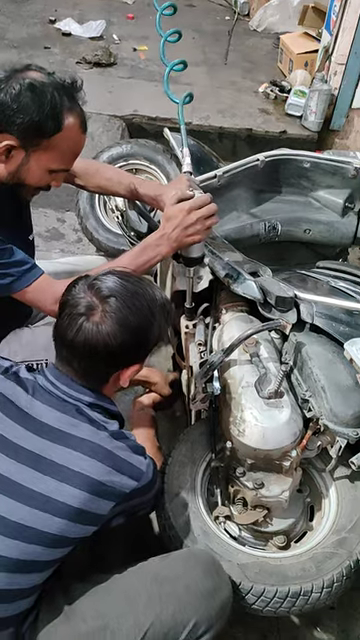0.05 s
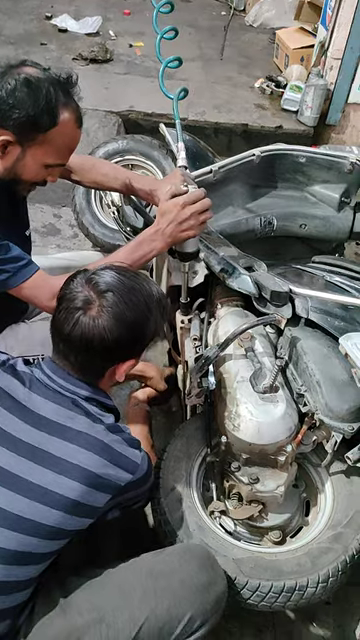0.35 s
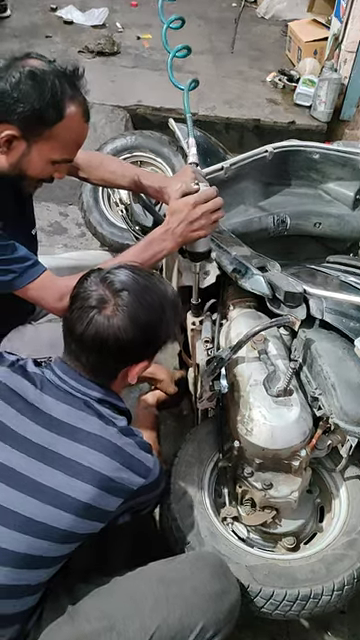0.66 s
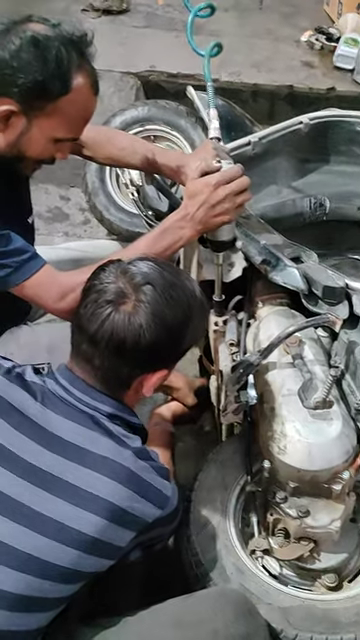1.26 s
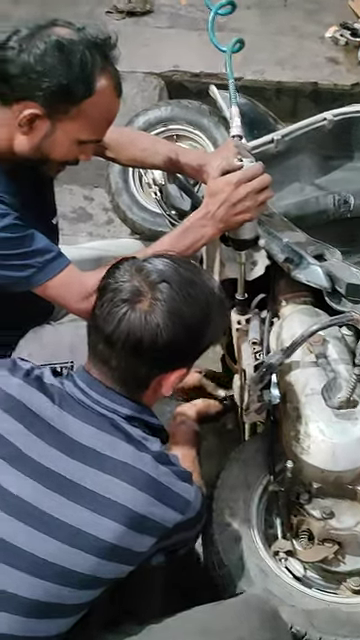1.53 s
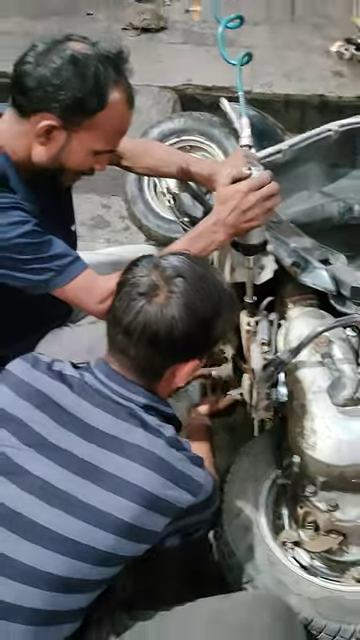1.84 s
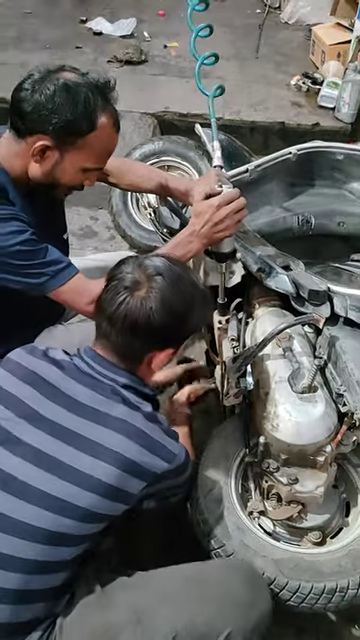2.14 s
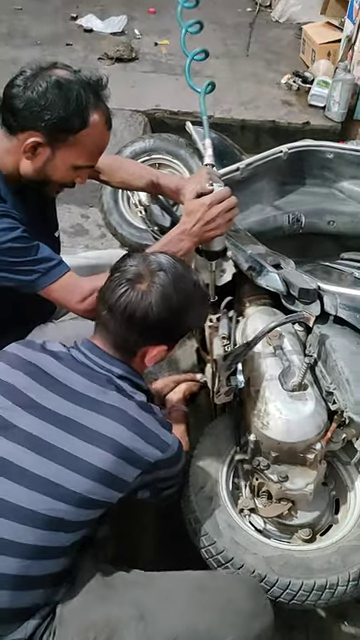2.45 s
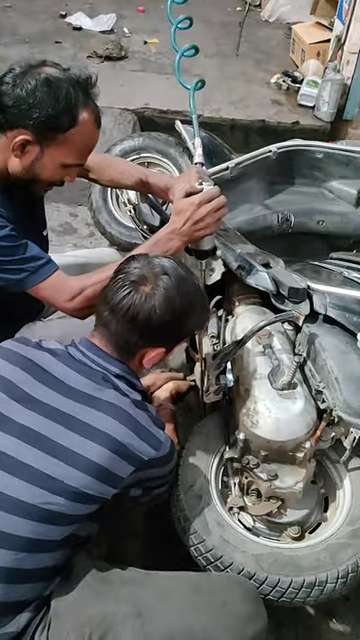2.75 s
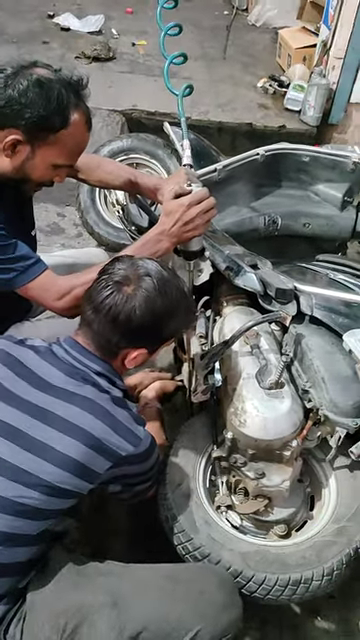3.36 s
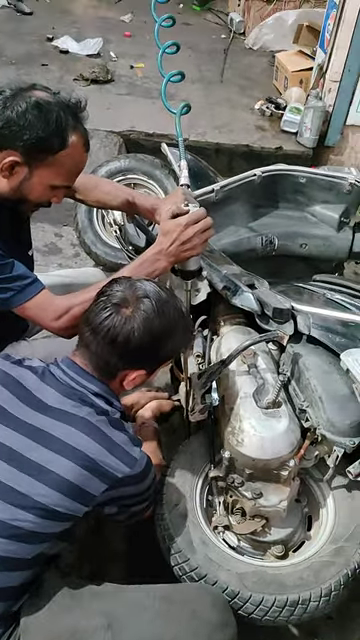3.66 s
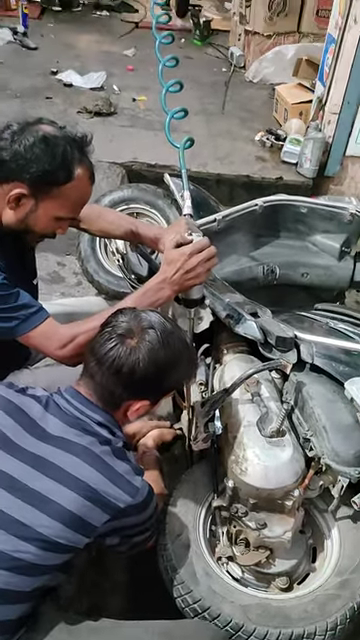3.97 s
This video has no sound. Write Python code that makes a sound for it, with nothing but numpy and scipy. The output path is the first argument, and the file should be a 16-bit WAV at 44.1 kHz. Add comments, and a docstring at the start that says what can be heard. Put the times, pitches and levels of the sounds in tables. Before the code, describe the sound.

A pneumatic hammer rattles rapidly against a scooter's steel frame, with air hissing.

```python
"""A small workshop, a stereo microphone pair close to an upturned scooter. From the start a pneumatic
hammer's exhaust hisses over a low rumble. At once the chisel drives against the steel frame, about 17
blows a second: each cracks, rings the steel, shakes casing and panels a moment later, and ends in a puff
on the return stroke. From 0.14 s some blows land square and clank; from 0.2 s stray air now and then
buffets the microphone. Between 2.2 and 2.9 s the tool labours and limps slightly, then hammers on."""
import sys
import numpy as np
from scipy import signal
from scipy.fft import rfft, irfft
from scipy.io import wavfile
from scipy.ndimage import uniform_filter1d

SR = 44100
rng = np.random.default_rng(int(sys.argv[2]) if len(sys.argv) > 2 else 0)


def file_out(sig):
    """Save sig as 16-bit WAV at sys.argv[1]."""
    # one column per channel
    cols = np.atleast_2d(sig).T
    # limit, then scale
    lim = np.clip(cols, -1, 1)
    pcm = np.round(lim * 32767).astype(np.int16)
    wavfile.write(sys.argv[1], SR, pcm)


N = 176400
TIME = np.arange(N) / SR
HZ = np.maximum(np.arange(N // 2 + 1) * SR / N, 1)


def from_db(db):
    """Decibels to gain."""
    return 10 ** (np.asarray(db) / 20)


def at_hz(table, hz=HZ, column=1):
    """One column of a table, read on a log-frequency axis."""
    rows = np.array(table)
    return np.interp(np.log(hz), np.log(rows[:, 0]), rows[:, column])


def at_time(table, s=TIME, column=1):
    """One column of a table, read in time."""
    rows = np.array(table)
    return np.interp(s, rows[:, 0], rows[:, column])


def bump(s, width):
    """A bell curve of height 1."""
    return np.exp(-.5 * (s / width) ** 2)


def pan(db):
    """Left and right gains of constant power; positive is to the left."""
    gains = from_db(np.array([np.atleast_1d(db), -np.atleast_1d(db)]) / 2)
    return gains / np.sqrt(np.mean(gains ** 2, axis=0))


def clicks(times, gains):
    """One click at each time."""
    out = np.zeros(N)
    np.add.at(out, np.clip((times * SR).astype(int), 0, N - 1), gains)
    return out


def convolve(train, response):
    """Every click sets off the response."""
    return signal.fftconvolve(np.atleast_2d(train), np.atleast_2d(response), axes=1)[:, :N]


# balance of noise across the microphone pair: f/Hz, left-right/dB
MIC_BALANCE = [(60, -4), (170, -0.5), (700, -5.5), (1300, -2), (3000, -2.5), (6800, -4), (8400, 2.5),
               (9500, -8), (11000, -6), (12600, -15.5), (13500, -17), (15000, -16)]
# likeness of the two channels: f/Hz, correlation
MIC_LIKENESS = [(60, 0.9), (200, 0.98), (600, 0.27), (1400, 0.27), (2800, 0), (15000, 0)]


def colour(white, gain):
    """Two unrelated noises become one stereo sound at the microphones, with this gain per Hz."""
    mid, side = rfft(white)
    alike = np.clip(at_hz(MIC_LIKENESS), -1, 1)
    pair = np.sqrt((1 + alike) / 2) * mid + np.sqrt((1 - alike) / 2) * side * np.array([[1], [-1]])
    return irfft(pair * gain * pan(at_hz(MIC_BALANCE)) * np.sqrt(SR / 2), N)


# room tone of the workshop: f/Hz, level/dB per Hz
ROOM_TONE = [(15, -45), (32, -68), (50, -55.5), (100, -60), (185, -57.5), (300, -62.5), (600, -71.5),
             (2000, -108)]


def room_tone():
    """The workshop's steady low rumble."""
    return colour(rng.standard_normal((2, N)), from_db(at_hz(ROOM_TONE)))


# steady exhaust air: f/Hz, level/dB per Hz
HISS_SPECTRUM = [(500, -63.5), (900, -64.5), (1600, -69), (2300, -63), (2950, -59), (4200, -60.5),
                 (5000, -59.5), (6800, -59), (9500, -65), (10300, -67), (12000, -66), (13000, -62.5),
                 (14200, -63.5), (15200, -68.5)]
# burst of air on the return stroke: f/Hz, level/dB per Hz
PUFF_SPECTRUM = [(500, -73), (1500, -73), (3000, -63.5), (5500, -62), (9000, -75.5), (13500, -61.5),
                 (15000, -66)]
# drift of hiss and puffs together: t/s, level/dB
EXHAUST_LEVEL = [(0, 0.5), (.8, 1), (1.6, 0.5), (2.4, -0.35), (3.1, 1.16), (4, 0.8)]


def exhaust(blows, sag_db=-1.8, sag_lag_s=.03, sag_width_s=.019, puff_lag_s=.0225, puff_rise_s=.005):
    """The air's hiss sags after each blow and puffs as the valve turns over."""
    age = TIME[:SR // 10]
    strokes = clicks(blows, np.ones(len(blows)))
    sag = from_db(convolve(strokes, sag_db * bump(age - sag_lag_s, sag_width_s)))
    opened = np.maximum(age - puff_lag_s, 0) / puff_rise_s
    burst = convolve(strokes, opened * np.exp(1 - opened))
    hiss = colour(sag * rng.standard_normal((2, N)), from_db(at_hz(HISS_SPECTRUM)))
    puffs = colour(burst * rng.standard_normal((2, N)), from_db(at_hz(PUFF_SPECTRUM)))
    air = from_db(at_time(EXHAUST_LEVEL)) * (hiss + puffs)
    return flicker(reflect(air))


def reflect(air, count=14, total_db=-9, latest_s=.008):
    """Nearby surfaces return a few early echoes, different ones to each microphone."""
    lags = rng.uniform(.001, latest_s, (2, count))
    echoes = np.array([clicks(side, rng.choice([-1, 1], count)) for side in lags])
    echoes *= from_db(total_db) / np.sqrt(count)
    return air + convolve(air, echoes[:, :SR // 10])


def flicker(air, depth_db=1.5, rate_hz=7, width_hz=300):
    """Narrow bands of the hiss swell and fade at random, so its colour keeps shifting."""
    framing = dict(nperseg=SR // 86, noverlap=SR // 115)
    hz, s, frames = signal.stft(air, SR, **framing)
    patches = uniform_filter1d(rng.standard_normal(frames.shape[1:]), round(width_hz / hz[1]), axis=0)
    patches = uniform_filter1d(patches, round(.5 / rate_hz / s[1]), axis=1)
    gain = from_db(depth_db * patches / patches.std())
    return signal.istft(frames * gain, SR, **framing)[1][:, :N]


# speed of the piston: t/s, blow rate/Hz
PISTON_RATE = [(0, 17.341), (0.5, 17.293), (1, 17.245), (1.45, 17.332), (1.75, 16.759), (2.05, 16.405),
               (2.35, 16.616), (2.7, 16.536), (3, 16.949), (3.3, 17.079), (3.65, 16.959), (4, 16.658)]


def piston_blows(first_cycle=.34, labour_s=(2.2, 2.93), limp_s=.0007, jitter_s=.00015):
    """The time of one blow per piston cycle; while the tool labours they come late and early by turns."""
    cycles = np.cumsum(at_time(PISTON_RATE)) / SR - first_cycle
    number = np.arange(int(cycles[-1]) + 1)
    blows = np.interp(number, cycles, TIME)
    labouring = (blows > labour_s[0]) & (blows < labour_s[1])
    limp = limp_s * (-1) ** number * labouring
    return blows + limp + jitter_s * rng.standard_normal(len(blows))


def struck(modes, blows, force, spread_db=.8, detune=.004, scatter_s=0):
    """Each blow rings every mode at a slightly different strength and pitch; loose parts lag unevenly."""
    out, age = np.zeros((2, N + SR)), TIME[:SR // 7]
    for k, (hz, db, t60, pan_db) in enumerate(modes):
        decay = (-1) ** k * pan(pan_db) * from_db(db - 60 * age / t60)  # modes alternate in polarity
        for at, gain, (louder, sharper, later) in zip(blows, force, rng.standard_normal((len(blows), 3))):
            start = int((at + scatter_s * abs(later)) * SR)
            tone = np.sin(2 * np.pi * hz * (1 + detune * sharper) * age)
            out[:, start:start + len(age)] += gain * from_db(spread_db * louder) * decay * tone
    return out[:, :N]


def clatter(blows, force, envelope, spectrum, alike):
    """Countless close modes under one envelope: a share is alike in every blow, the rest is new."""
    gain = from_db(at_hz(spectrum))
    same = convolve(clicks(blows, force), envelope * rng.standard_normal((2, len(envelope))))
    power = np.abs(convolve(clicks(blows, force ** 2), envelope ** 2))
    fresh = np.sqrt(power) * rng.standard_normal((2, N))
    return colour(same, gain * np.sqrt(alike)) + colour(fresh, gain * np.sqrt(1 - alike))


# crack of the contact: f/Hz, level/dB per Hz
CRACK_SPECTRUM = [(200, -54.5), (900, -66), (1500, -59), (2300, -61.5), (3400, -58.5), (5400, -55),
                  (6900, -57.5), (9500, -63), (15000, -66.5)]


def crack(blows, force, rise_s=.0012, t60_s=.036):
    """The chisel meets the frame with a short, bright burst."""
    age = TIME[:SR // 4]
    envelope = np.minimum(age / rise_s, 1) * from_db(-60 * np.maximum(age - rise_s, 0) / t60_s)
    return clatter(blows, force, envelope, CRACK_SPECTRUM, alike=.58)


# modes of the struck steel: f/Hz, level/dB, t60/s, left-right/dB
STEEL_MODES = [(1340, -24, 0.036, 7), (1965, -29, 0.06, -12), (2700, -29.5, 0.064, 0), (2933, -28, 0.2, -7),
               (3220, -25.5, 0.083, -10), (3767, -29, 0.1, -16), (3880, -28.5, 0.15, -1),
               (4845, -25.5, 0.085, 4), (5100, -28.5, 0.086, -3), (5520, -24.5, 0.06, -5)]
# dense ring of frame and workshop: f/Hz, level/dB per Hz, share alike in every blow
RING_SPECTRUM = [(70, -66, 0.33), (200, -57, 0.6), (433, -59, 1), (776, -54.5, 0.65), (1040, -85, 1),
                 (1320, -56.5, 0.68), (2220, -57, 0.2), (3100, -56.5, 0.4), (5700, -55, 0.24),
                 (7000, -60.5, 0.35), (14000, -72.5, .1)]


def steel(blows, mode_force, ring_force, lag_s=.003, rise_s=.0026, t60_s=.12):
    """The steel's own modes sound at once; a dense ring of frame and room swells just behind."""
    modes = struck(STEEL_MODES, blows, mode_force, spread_db=1.6)
    age = np.maximum(TIME[:SR // 4] - lag_s, 0)
    envelope = (1 - np.exp(-age / rise_s)) * from_db(-60 * age / t60_s)
    alike = at_hz(RING_SPECTRUM, column=2)
    return modes + clatter(blows, ring_force, envelope, RING_SPECTRUM, alike)


# modes of engine casing, body panels, hollow seat tub, frame tubes and loose fittings:
# f/Hz, level/dB, t60/s, left-right/dB
CASING_MODES = [(1194, -27.5, 0.088, 4), (1329, -27, 0.11, -6), (1364, -34.5, 0.13, 0),
                (1498, -29, 0.043, -2)]
PANEL_MODES = [(122, -25, 0.055, -1), (186, -26, .19, 1.5), (245, -27, 0.03, 5)]
SEAT_TUB_MODES = [(359, -25, .17, 0)]
TUBE_MODES = [(289, -31, 0.2, -2), (425, -29, 0.085, -3), (488, -34, 0.097, -4), (570.6, -32.5, 0.17, -14),
              (626.7, -31.5, 0.15, 0), (690, -31, 0.069, -4), (758, -28.5, 0.083, -6)]
FITTING_MODES = [(787, -21, 0.029, -2), (827, -21, 0.039, 4), (908, -24, 0.055, -28)]


def bodywork(blows, casing_force, panel_force, tube_force):
    """The shock spreads through the scooter: its parts ring 2.5 to 7.5 ms after the blow."""
    casing = struck(CASING_MODES, blows + .0045, casing_force)
    panels = struck(PANEL_MODES, blows + .004, panel_force)
    seat_tub = struck(SEAT_TUB_MODES, blows + .0025, np.ones(len(blows)))
    tubes = struck(TUBE_MODES, blows + .004, tube_force, scatter_s=.0002)
    fittings = struck(FITTING_MODES, blows + .0075, casing_force)
    return casing + panels + seat_tub + tubes + fittings


def thumps(blows, force, jolt_lag_s=.0066, jolt_width_s=.00084, knock_lag_s=.027, knock_width_s=.0012):
    """The scooter jolts to and fro, then the piston knocks softly on its way back."""
    age = TIME[:SR // 10]
    jolt = from_db(-16) * (age - jolt_lag_s) / jolt_width_s * bump(age - jolt_lag_s, jolt_width_s)
    knock = from_db(-33) * bump(age - knock_lag_s, knock_width_s)
    return convolve(clicks(blows, force), jolt - knock)


# blows that land square: t/s, f/Hz, level/dB
SQUARE_BLOWS = [(.135, 2970, -15.5), (.424, 3300, -18), (1.06, 4800, -18), (1.234, 3330, -19),
                (1.525, 5650, -19), (1.583, 5520, -21), (1.641, 5550, -19), (1.7, 3330, -15.5),
                (1.82, 2940, -17), (1.88, 3040, -30), (2.122, 3300, -30), (2.182, 5560, -16),
                (2.244, 5570, -16), (2.304, 3680, -21), (2.364, 2950, -24), (2.424, 3640, -19)]
# mode cluster of the chisel: multiple of the blow's f, level/dB, t60/s, left-right/dB
CHISEL_MODES = [(.97, -6, .025, -3), (1, -3.5, .032, -3), (1.04, -6, .025, -3), (1.12, -9, .02, -3)]


def clanks(gap_s=.0025, chatter_db=(0, -2, -5, -9)):
    """A blow that lands square makes the chisel chatter briefly and rings one cluster of its modes."""
    out = np.zeros((2, N))
    for at, hz, db in SQUARE_BLOWS:
        modes = [(hz * ratio, level_db, t60, pan_db) for ratio, level_db, t60, pan_db in CHISEL_MODES]
        touches = at + gap_s * np.arange(len(chatter_db))
        out += struck(modes, touches, from_db(db + np.array(chatter_db)), scatter_s=gap_s / 2)
    return out


# stray air right at the microphone: t/s, level/dB, width/s
AIR_SLUGS = [(.197, -15, .0024), (.316, -21, 0.0034), (0.373, -13, 0.0022), (0.953, -17, 0.0041),
             (1.882, -21, 0.0031), (1.944, -16, .0034), (2.004, -17, 0.0024), (2.487, -10.5, 0.0038),
             (2.612, -10, 0.006), (2.732, -16, .004), (3.265, -18, .003), (3.849, -12, 0.0029),
             (3.973, -5, 0.0049)]


def buffets(leak_hz=6, pan_db=-26):
    """Each slug of air pushes on the right microphone's port and leaks away: one solid thud."""
    push = sum(from_db(db) * bump(TIME - at, width) for at, db, width in AIR_SLUGS)
    leak = signal.butter(1, leak_hz, "high", fs=SR, output="sos")
    return -pan(pan_db) * signal.sosfilt(leak, push)


# the chisel's shifting bite: t/s, then level/dB added to crack, steel modes, dense ring,
# casing and fittings, panels and thumps, frame tubes
CHISEL_BITE = [(0, 5.5, -0.5, -1, -3.5, 0, -14), (.8, 2.5, 0, -0.5, 1, -2, -9),
               (1.5, 3.5, -1.5, -0.5, -0.5, -1, -4.5), (1.9, 4, -2.5, -2.5, -6, -0.5, 3),
               (2.3, 3.5, -1.5, -0.5, -3.5, 0, 0.5), (2.7, 3.5, -1.5, -1.5, -2, -0.5, 0.5),
               (3.1, 2, -4, -0.5, 0.5, 0, -0.5), (4, 2, -3, -1, 0, 0.5, -1.5)]


def scene(force_spread_db=.35):
    """Hammering, exhaust, stray air and room tone as they reach the microphones."""
    blows = piston_blows()
    bite_db = np.array([at_time(CHISEL_BITE, blows, column) for column in range(1, 7)])
    forces = from_db(bite_db + force_spread_db * rng.standard_normal(len(blows)))
    crack_force, mode_force, ring_force, casing_force, panel_force, tube_force = forces
    metal = crack(blows, crack_force) + steel(blows, mode_force, ring_force)
    body = bodywork(blows, casing_force, panel_force, tube_force) + thumps(blows, panel_force)
    return metal + body + clanks() + exhaust(blows) + buffets() + room_tone()


# notches of the microphone port: f/Hz, width/Hz, level/dB
PORT_NOTCHES = [(7870, 510, -6), (8150, 400, -5.5), (11020, 220, -3.5)]


def record(dry, low_cut_hz=18, top_hz=15500):
    """The microphone notches the treble and loses the deepest bass; the top is cut steeply."""
    notches_db = sum(db * bump(HZ - hz, width) for hz, width, db in PORT_NOTCHES)
    heard = irfft(rfft(dry) * from_db(notches_db), N)
    heard = signal.sosfilt(signal.butter(2, low_cut_hz, "high", fs=SR, output="sos"), heard)
    return irfft(rfft(heard) / np.sqrt(1 + (HZ / top_hz) ** 300), N)


dry = scene()
out = record(dry)
file_out(out)
```